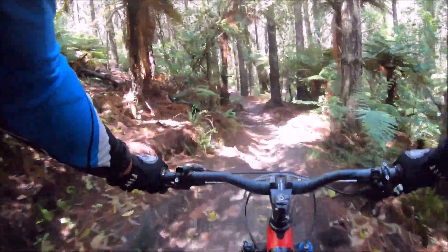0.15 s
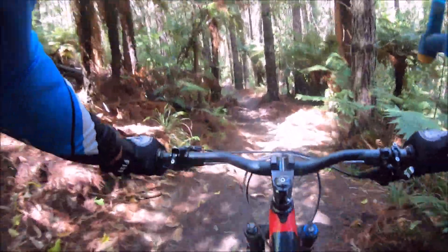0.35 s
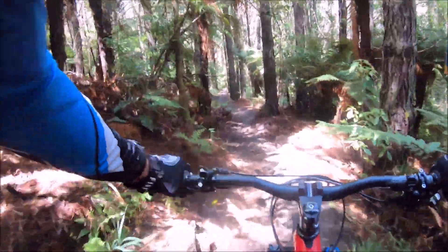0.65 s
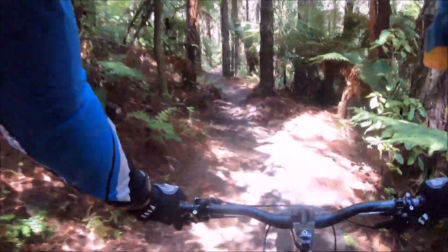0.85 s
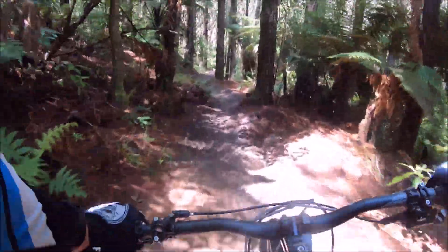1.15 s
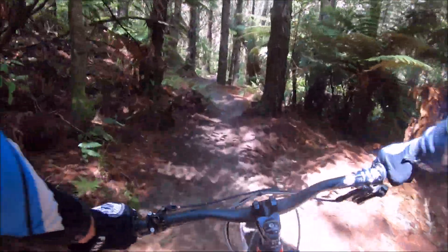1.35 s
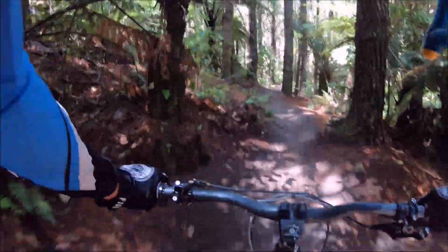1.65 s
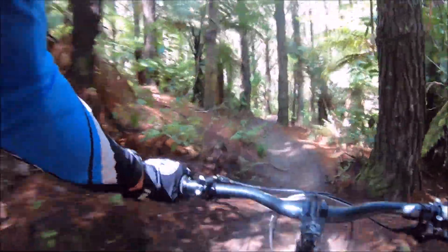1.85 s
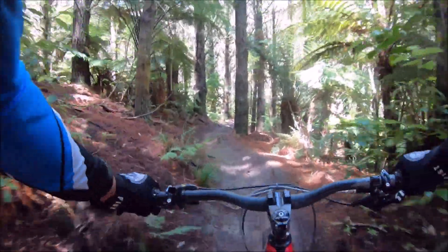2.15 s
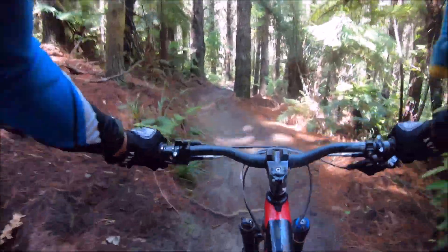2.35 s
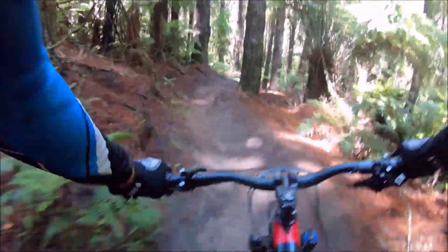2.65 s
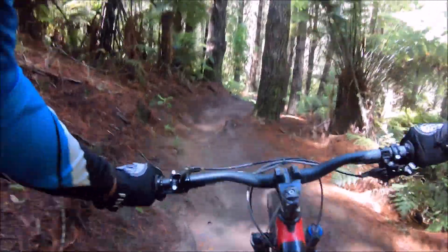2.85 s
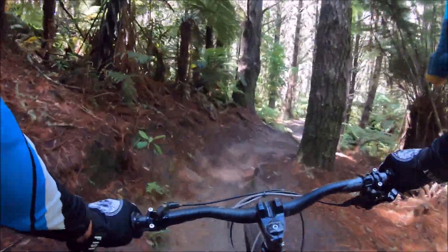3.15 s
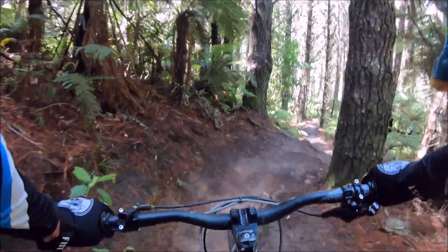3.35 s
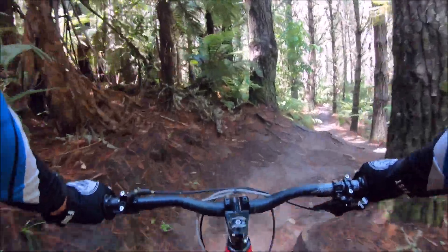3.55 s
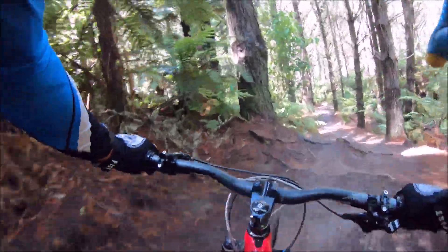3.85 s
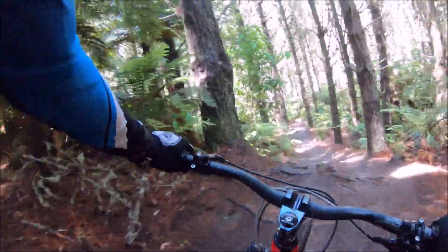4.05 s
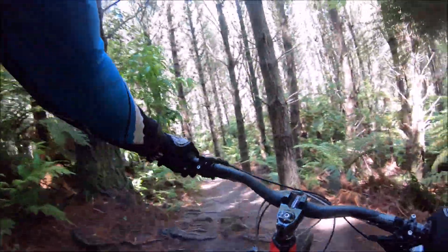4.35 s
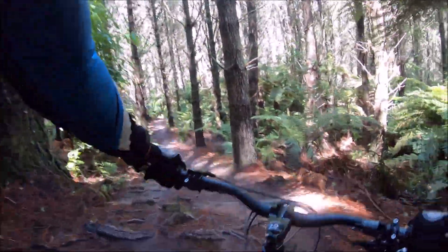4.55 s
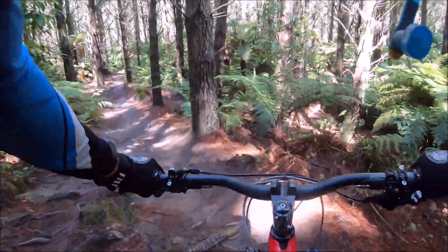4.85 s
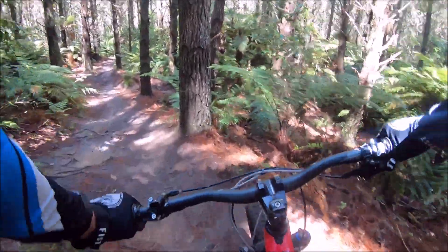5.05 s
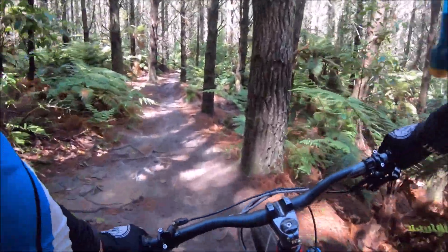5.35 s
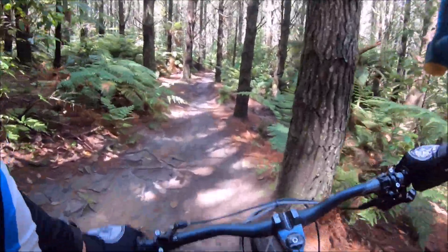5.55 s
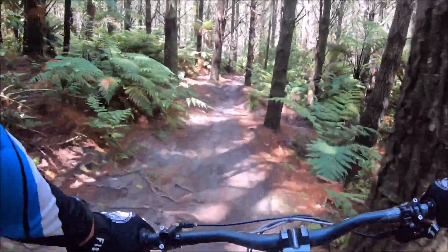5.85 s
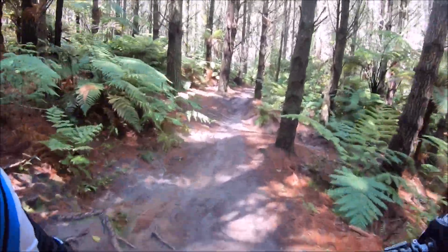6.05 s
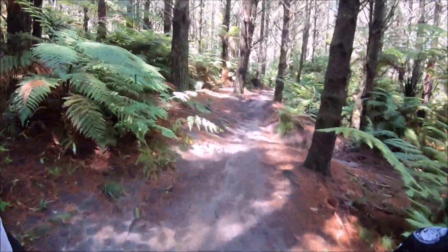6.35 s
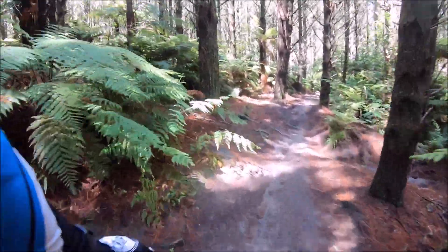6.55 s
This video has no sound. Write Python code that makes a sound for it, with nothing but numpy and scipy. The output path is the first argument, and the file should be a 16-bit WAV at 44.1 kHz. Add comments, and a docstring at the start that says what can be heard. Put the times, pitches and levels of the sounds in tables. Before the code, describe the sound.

A mountain bike descends a rooty forest trail, recorded close by a microphone on the rider. Throughout, uneven low rumble from wind and shocks swells with soft tyre thuds, over a dull tread roar and fine crunching grit. Several knocks come in the first half second, with barely audible tiny high squeaks, then a rattling cluster with bright clacks around 0.9-1.2. A short tyre scuff passes at 1.65. From 2.3 to 3.1 the ride is roughest: hard knocks, chattering shell clacks, rapid dry chain slaps and faint metallic pings. It smooths from 3.1, quietest near 4.3, with throbbing cicada hiss faintly wide around 4. Knocks resume at 4.5, peaking in a heavy low blow at 5.04, then more at 5.6, 6.0-6.1 and 6.4, with occasional chain ticks. A faint hollow hum colours the shocks; cicadas linger until the end at about 6.7.

```python
"""A mountain bike rolls down a rooty forest trail, heard from a microphone strapped to the rider.
Shaped noise makes the rumble of wind and road shock in the housing and the tyres' crunch on dirt;
sagging sines are the landings, struck modes the bumps on the mount, and noise ticks the chain slaps.
Faint are a hollow hum, one tyre scuff, tiny sine squeaks and the throbbing treble hiss of cicadas."""
import sys
import numpy as np
from scipy import signal
from scipy.fft import rfft, irfft, next_fast_len
from scipy.io import wavfile
from scipy.ndimage import uniform_filter1d

SR = 44100
rng = np.random.default_rng(int(sys.argv[2]) if len(sys.argv) > 2 else 0)


def volts_from_db(level):
    """Convert decibel levels to linear amplitude ratios."""
    exponent = np.asarray(level, float) / 20
    return 10 ** exponent


def to_wav(sig):
    """Store sig (one row per channel, or 1-D mono) as 16-bit WAV at the path in sys.argv[1].

    Samples outside -1..1 are clipped; the rate is SR.
    """
    pcm = np.clip(np.atleast_2d(sig), -1, 1) * 32767
    pcm = np.round(pcm).astype(np.int16)
    wavfile.write(sys.argv[1], SR, pcm.T)  # frames by channels


N = 295029
T = np.arange(N) / SR  # s

# The ride along the trail, base levels: start_s, rumble_db (wind and shock), roar_db (tread),
# hiss_db (grit)
RIDE_LEVELS = [(0.0, -40.5, -43, -48), (0.84, -38.5, -46, -51.5), (0.89, -37, -42, -47),
               (1.11, -34.5, -43.5, -53), (1.18, -37, -44, -51), (2.25, -42.5, -43, -51),
               (2.52, -34.5, -41, -51.5), (2.83, -35.5, -42, -53.5), (3.07, -37.5, -47, -54),
               (3.41, -41.5, -46.5, -54), (3.82, -40, -46, -47), (4.04, -49.5, -45, -49.5),
               (4.34, -53.5, -58.5, -53.5), (4.75, -37, -48, -54.5), (5.18, -43, -45.5, -52.5),
               (5.65, -40, -47.5, -52), (6.28, -36, -43, -52.5), (6.69, -51, -46, -53)]
# Bumps that knock the mount: strike_s, body_peak_db (ahead of the padding), pitch_hz (of the blow),
# brightness_db (clack of the shell against the body)
BUMPS = [(0.193, -25, 462, -11), (0.259, -30, 595, -9), (0.354, -35, 910, -15), (0.437, -20, 680, -10.5),
         (0.879, -28, 910, -6), (0.901, -35.5, 830, -3), (0.958, -29.5, 885, -2), (0.967, -45.5, 1500, 10),
         (0.977, -34, 714, 1), (0.995, -27, 1010, -5), (1.02, -38, 1400, 6), (1.089, -23.5, 754, -3.5),
         (1.225, -29, 526, -16), (1.523, -30, 890, -0.5), (1.558, -25, 490, -17), (1.591, -27, 650, -39),
         (1.892, -25.5, 696, -16), (1.969, -28, 330, -17), (2.129, -28.5, 905, -5),
         (2.264, -32.5, 485, -25), (2.331, -33.5, 606, -18), (2.359, -16.5, 685, -14),
         (2.434, -17.5, 620, -14), (2.503, -28.5, 575, -3), (2.519, -44.5, 900, 12), (2.559, -29, 755, -5),
         (2.61, -23, 666, -15), (2.629, -21, 406, -18), (2.701, -27, 950, -6), (2.761, -26, 1440, -3),
         (2.777, -33.5, 1000, 1), (2.796, -30.5, 1320, 1), (2.814, -42, 1110, -10), (2.856, -41, 1090, -11),
         (2.88, -34, 1120, -21), (2.902, -17, 500, -13.5), (2.917, -25, 820, -5.5), (2.998, -36, 1300, -3),
         (3.01, -30, 1200, -6), (3.047, -35, 1070, 4.5), (3.063, -33, 1000, -19), (3.394, -34.5, 580, -20),
         (4.514, -41.5, 1060, -7), (4.616, -32.5, 590, 1.5), (4.701, -36.5, 1110, 7),
         (4.726, -34.5, 980, -3), (4.742, -37.5, 1400, -3), (4.761, -38, 900, -10), (4.864, -31.5, 880, -8),
         (4.976, -28, 503, -40), (5.02, -28.5, 1240, -5), (5.041, -12, 447, -19), (5.128, -26, 925, -5.5),
         (5.175, -33.5, 1010, -2.5), (5.214, -46, 586, 3), (5.565, -35.5, 540, -23),
         (5.589, -19.5, 624, -16), (5.957, -22.5, 450, -13.5), (6.081, -39.5, 1350, -19),
         (6.098, -25, 1500, -11), (6.104, -31.5, 1510, -1), (6.124, -43.5, 1400, 7.5),
         (6.38, -30.5, 563, -18), (6.399, -46.5, 1500, 13), (6.443, -28.5, 680, -16),
         (6.619, -32.5, 710, -27)]
# Chain and cable slaps: start_s, level_db (ahead of the housing's dulling)
CHAIN_SLAPS = [(0.6657, -31), (0.96, -44), (1.0583, -26), (1.12, -29), (1.675, -32.5), (2.206, -41),
               (2.404, -33), (2.486, -34), (2.6557, -25), (2.699, -26.5), (2.7368, -24.5), (2.766, -24),
               (2.857, -34), (2.965, -26), (3.0112, -30), (3.023, -40), (4.62, -31), (4.844, -31),
               (4.867, -44), (5.088, -30), (5.6923, -36.5), (5.966, -36), (5.991, -28.5), (6.2083, -35),
               (6.438, -33)]


def evened(x):
    """Scales to rms 1."""
    return x / np.sqrt(np.mean(x ** 2) + 1e-20)


def curve(rows, axis=1):
    """One column of a table, drawn in straight lines to every sample."""
    rows = np.transpose(rows)
    return np.interp(T, rows[0], rows[axis])


def coloured(x, tone):
    """Filters by a spectrum table, 90 dB down outside it, and scales to rms 1."""
    tone_hz, tone_db = np.transpose(tone)
    size = next_fast_len(N)
    hz = np.fft.rfftfreq(size, 1 / SR) + 1  # 1 Hz up, to keep the logarithm finite
    gain_db = np.interp(np.log(hz), np.log(tone_hz), tone_db, -90, -90)
    return evened(irfft(rfft(x, size) * volts_from_db(gain_db), size)[:N])


def wobble(seconds):
    """Slow random drift of rms 1: noise averaged twice over the given time."""
    size = max(round(seconds * SR), 2)
    once = uniform_filter1d(rng.standard_normal(N), size)
    return evened(uniform_filter1d(once, size))


def grains(per_s, spread_db):
    """Sparse clicks of random sign, a few much larger."""
    size = volts_from_db(spread_db * np.minimum(rng.exponential(1, N), 2.5))
    return size * rng.standard_normal(N) * (rng.random(N) < per_s / SR)


def add(mix, s, sound):
    """Mixes a sound in from time s."""
    part = mix[max(round(s * SR), 0):][:len(sound)]
    part += sound[:len(part)]


def patchy(x, depth_db):
    """Lets the colour drift in patches a few hundred Hz wide and a few hundredths of a second long."""
    z = signal.stft(x, nperseg=256, noverlap=192)[2]
    across_hz = uniform_filter1d(rng.standard_normal(z.shape), size=3, axis=0)
    patches = uniform_filter1d(across_hz, size=30, axis=1)
    return evened(signal.istft(z * volts_from_db(depth_db * evened(patches)), nperseg=256, noverlap=192)[1][:N])


def rattle(pitches_hz, per_s):
    """Loose stones, cables and buckles: small clicks, each a few dying cycles at its own pitch."""
    t = np.arange(SR // 30) / SR
    total = 0
    for hz in pitches_hz:
        click = np.sin(2 * np.pi * hz * t) * np.exp(-hz * t / 2.8) * np.sqrt(hz)
        total = total + signal.oaconvolve(grains(per_s, 2.34), click)[:N]
    return evened(total)


def jolt(events, usual_db, rise_s=0.0004, fall_s=0.036):
    """How hard the bike still shakes after each blow, by the square root of the blow's strength."""
    out, t = np.zeros(N), np.arange(SR // 5) / SR
    for s, db, *_ in events:
        shake = (1 - np.exp(-t / rise_s)) * np.exp(-t / fall_s)
        add(out, s, volts_from_db((db - usual_db) / 2) * shake)
    return out


def ring(hz, db, t60, contact):
    """Decaying modes, alternate in sign, driven by a short contact; peak 1."""
    t = np.arange(SR // 10) / SR
    sign = (-1) ** np.arange(len(hz))[:, None]
    modes = volts_from_db(db - 60 * t / t60) * np.sin(2 * np.pi * hz * t) * sign
    blow = signal.fftconvolve(modes.sum(0), contact)
    return blow / abs(blow).max()


def buffet():
    """Lumpy low pressure from wind and shock, heaving with a few cycles of thud where a tyre lands."""
    # Tyre landings felt as a low thud: start_s, peak_db, pitch_hz (at the start)
    landings = [(0.059, -24.5, 91), (0.685, -25.5, 65.5), (0.87, -23, 74), (1.012, -21, 75.6),
                (1.052, -32, 75.5), (1.465, -20.5, 89), (1.61, -25, 157), (1.955, -20.5, 86.5),
                (2.351, -19.5, 108), (2.429, -22, 59.4), (2.621, -22, 73.4), (2.813, -22, 78),
                (2.891, -21, 85), (3.131, -24, 52.3), (3.589, -22.5, 64), (3.83, -26.5, 89),
                (3.919, -24, 113), (4.411, -22, 185), (4.414, -30.5, 69), (4.753, -28.5, 87),
                (5.034, -19.5, 108), (5.335, -33, 159), (5.503, -23, 95), (6.503, -23, 153)]
    # Spectrum of the rumble: pitch_hz, density_db (relative, per Hz)
    buffet_tone = [(12, -1), (20, 7.5), (45, 8.5), (86, 7), (150, 6), (248, -3.5), (284, -11), (437, -31),
                   (500, -10), (650, -78)]
    # the rumble swells after each landing
    heave = 1 + jolt(landings, usual_db=-29.5, rise_s=0.004, fall_s=0.06)
    lumpy = rng.standard_normal(N) * volts_from_db(3.2 * np.tanh(wobble(0.033)))
    out = volts_from_db(curve(RIDE_LEVELS)) * heave * coloured(lumpy, buffet_tone)
    t = np.arange(SR // 10) / SR
    for s, db, hz in landings:
        u = t * hz / 0.62  # 1 at the peak; low thuds last longer
        sagging = np.sin(2 * np.pi * hz * t * (1 - 0.016 * u))
        add(out, s, volts_from_db(db) * sagging * (u * np.exp(1 - u)) ** 2)
    return out


def tyres():
    """The tread roars dully and crushes grit; every jolt shakes loose a burst of rattle."""
    # Spectrum of the tread's roar: pitch_hz, density_db (relative, per Hz)
    roll_tone = [(120, 0.5), (220, 0.5), (500, 1), (900, -6), (1500, -9.5), (2500, -16.5), (4000, -24)]
    # Spectrum of the crushed grit: pitch_hz, density_db (relative, per Hz)
    grit_tone = [(700, -50), (1200, -1.5), (2000, -1.5), (3200, -1.5), (3750, 2), (4200, 0.5), (4850, 1),
                 (5400, -4.5), (6500, -13), (9000, -22.5), (11000, -30.5), (13000, -89)]
    skip = wobble(0.0041)  # quick unevenness shared by roar and grit
    shake = jolt(BUMPS, usual_db=-23)
    roll = patchy(rng.standard_normal(N) * volts_from_db(2.0 * skip), depth_db=3.37)
    roll += (0.11 + 0.32 * shake) * rattle(np.geomspace(250, 2600, 10), per_s=40)
    grit = patchy(rng.standard_normal(N) * volts_from_db(1.88 * skip), depth_db=2.37)
    grit *= 1 + 0.74 * shake + jolt(CHAIN_SLAPS, usual_db=-38)
    grit += (0.036 + 0.56 * shake) * rattle(np.geomspace(1500, 9000, 10), per_s=110)
    roar = volts_from_db(curve(RIDE_LEVELS, axis=2)) * coloured(roll, roll_tone)
    hiss = volts_from_db(curve(RIDE_LEVELS, axis=3)) * coloured(grit, grit_tone)
    return roar + hiss


def knocks():
    """Each bump shakes the mount, most near the pitch of the blow, and clacks the shell."""
    # Modes of the mount: pitch_hz, t60_s
    mount_modes = [(300, 0.014), (370, 0.016), (470, 0.0085), (600, 0.014), (760, 0.015), (950, 0.012),
                   (1200, 0.012), (1500, 0.013)]
    # Modes of the shell: pitch_hz, level_db (relative), t60_s
    shell_modes = [(1787, -2, 0.02), (2308, 7, 0.0091), (3230, -2, 0.014)]
    low_hz, low_t60 = np.transpose(mount_modes)[:, :, None]
    high_hz, high_db, high_t60 = np.transpose(shell_modes)[:, :, None]
    out, t = np.zeros(N), np.arange(SR // 40) / SR
    chatter = 0.5 * np.exp(-((t - 0.007) / 0.0092) ** 2)  # builds before the strike, dies after it
    for s, db, hz, bright_db in BUMPS:
        hits = chatter * rng.standard_normal((2, len(t)))
        strike = np.exp(-((t - 0.0055) * hz / 0.18) ** 2)  # one padded contact, shorter for a higher blow
        ragged = 1.32 * volts_from_db(0.21 * (db + 14))  # light blows are one crisp tap, hard ones chatter
        low_db = -16 * abs(np.log2(low_hz / hz))  # 16 dB less per octave from the blow
        body = ring(low_hz, low_db, low_t60, strike + ragged * hits[0])
        clack = ring(high_hz, high_db, high_t60, strike ** 4 + 0.26 * ragged * hits[1])
        add(out, s - 0.006, volts_from_db(db) * (body + volts_from_db(bright_db) * clack))  # chatter leads the strike
    padding = signal.butter(4, 4800, fs=SR, output="sos")  # dulls the blows
    return signal.sosfilt(padding, out)


def slaps():
    """Chain and cable: sharp ticks of noise dulled by the housing, and a few faint rings of thin metal."""
    # Times when thin metal rings: start_s, level_db
    pings = [(2.683, -51), (2.749, -49), (3.01, -46)]
    # Modes of the thin metal: pitch_hz, level_db (relative), t60_s
    metal_modes = [(10200, -1, 0.047), (13750, -21, 0.06)]
    ticks, rings, t = np.zeros(N), np.zeros(N), np.arange(SR // 8) / SR
    for s, db in CHAIN_SLAPS:
        add(ticks, s, volts_from_db(db) * rng.standard_normal(len(t)) * np.exp(-t / 0.0021))
    metal = sum(volts_from_db(d - 60 * t / t60) * np.sin(2 * np.pi * hz * t) for hz, d, t60 in metal_modes)
    for s, db in pings:
        add(rings, s, volts_from_db(db) * (1 - np.exp(-t / 0.001)) * metal)
    low_cut = signal.butter(2, 2300, "highpass", fs=SR, output="sos")
    high_cut = signal.butter(3, 5200, fs=SR, output="sos")
    return signal.sosfilt(np.vstack([low_cut, high_cut]), ticks) + rings


def scuff():
    """A tyre scuffs over a root: a short scrape of noise in a resonance that climbs."""
    start_s, length_s, level_db = 1.64, 0.08, -32.5  # rms level, ahead of the swell
    from_hz, to_hz, width_hz = 149, 620, 390  # width of each of the two poles
    u = np.arange(0, 1, 1 / (length_s * SR))
    turn = np.exp(2j * np.pi * np.cumsum(from_hz + (to_hz - from_hz) * u) / SR)
    r, out = np.exp(-np.pi * width_hz / SR), np.zeros(N)
    noise = rng.standard_normal(len(u)) + 1j * rng.standard_normal(len(u))
    slow = signal.lfilter([1], np.poly([r, r]), noise)  # low noise, then carried up by the turn
    swell = np.sin(np.pi * np.sqrt(u))
    add(out, start_s, volts_from_db(level_db) * swell * evened((turn * slow).real))
    return out


def cavity(x):
    """A hollow note, perhaps the air in the tyre, hums with every shock: a narrow, wavering resonance."""
    centre_hz, width_hz, gain_db = 290, 24, 1
    turn = np.exp(2j * np.pi * np.cumsum(centre_hz * (1 + 0.05 * wobble(0.23))) / SR)
    r = np.exp(-np.pi * width_hz / SR)
    slow = signal.lfilter([1 - r], [1, -r], x / turn)  # the note shifted to 0 Hz and smoothed
    return volts_from_db(gain_db) * 2 * (turn * slow).real


def squeaks():
    """Short whistles near the top of hearing: sines under a rounded swell."""
    # Tiny squeaks: start_s, peak_db, pitch_hz
    whistles = [(0.1226, -54, 15000), (0.1544, -54, 15200), (0.4544, -57, 15400)]
    out, t = np.zeros(N), np.arange(SR // 45) / SR
    for s, db, hz in whistles:
        add(out, s, volts_from_db(db) * np.sin(2 * np.pi * hz * t) * np.hanning(len(t)))
    return out


def cicadas():
    """High hiss with one throb many times a second, its noise unlike at the two sides."""
    # Cicadas in the trees that the bike passes: start_s, level_db (mean of the two sides)
    passing = [(0.0, -86), (0.18, -71.5), (1.02, -67), (1.21, -86), (1.68, -75), (1.88, -110), (3.39, -110),
               (3.95, -67), (4.55, -74), (5.1, -67.5), (6.58, -66.5)]
    # Spectrum of the hiss: pitch_hz, density_db (relative, per Hz)
    cicada_tone = [(6470, -12), (11000, -25), (11600, 5), (12100, 10.5), (13200, 9), (15600, 4)]
    throb_per_s, quickening_per_s2, left_db = 28, 3.1, 1.6  # the throb quickens along the trail
    rate = (throb_per_s + quickening_per_s2 * T) * (1 + 0.032 * wobble(0.05))
    turns = np.cumsum(rate) / SR
    throb = 0.17 + np.exp(-(turns % 1) / 0.55)
    sides = [coloured(throb * rng.standard_normal(N), cicada_tone) for _ in range(2)]
    return volts_from_db(curve(passing) + left_db * np.array([[1], [-1]])) * sides


def scene():
    """All that shakes the housing is nearly alike at both sides; only the buzz is wide."""
    shocks = buffet() + tyres() + knocks() + scuff()
    near = shocks + cavity(shocks) + slaps() + squeaks()
    high_pass = signal.butter(1, 3000, "highpass", fs=SR, output="sos")
    treble = signal.sosfilt(high_pass, near)
    lean = volts_from_db(-30.5) * wobble(0.015) * treble  # treble leans very slightly from side to side at random
    return near + np.outer([1, -1], lean) + cicadas()


def roll_off(x):
    """The treble ends steeply here."""
    return signal.sosfilt(signal.butter(12, 15720, fs=SR, output="sos"), x)


def record(dry):
    """Hands over the finished mix of both sides."""
    return roll_off(dry)


dry = scene()
out = record(dry)
to_wav(out)
```